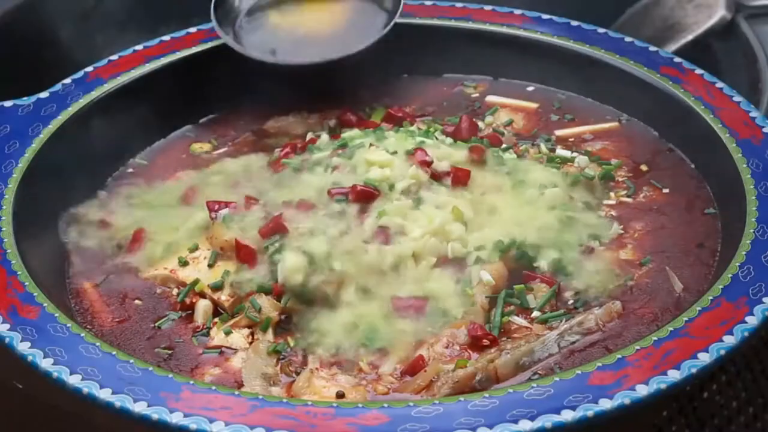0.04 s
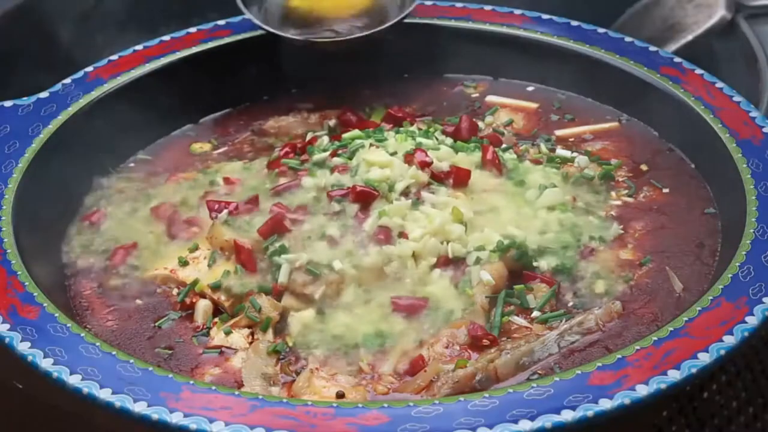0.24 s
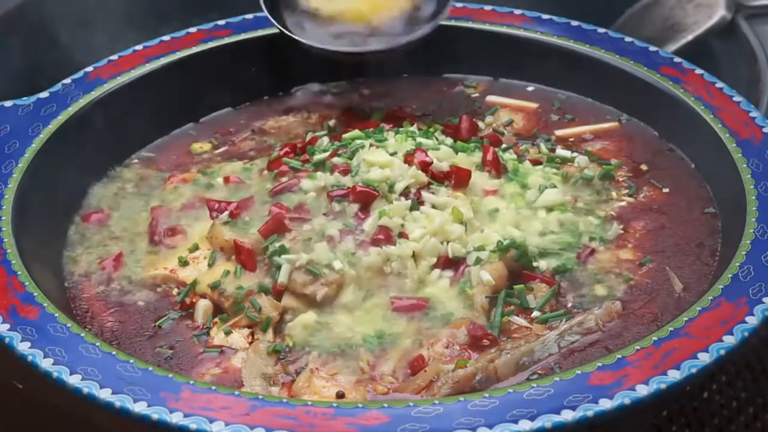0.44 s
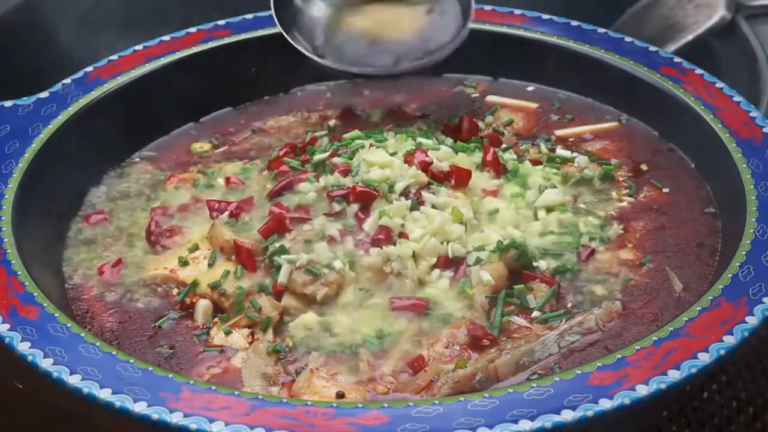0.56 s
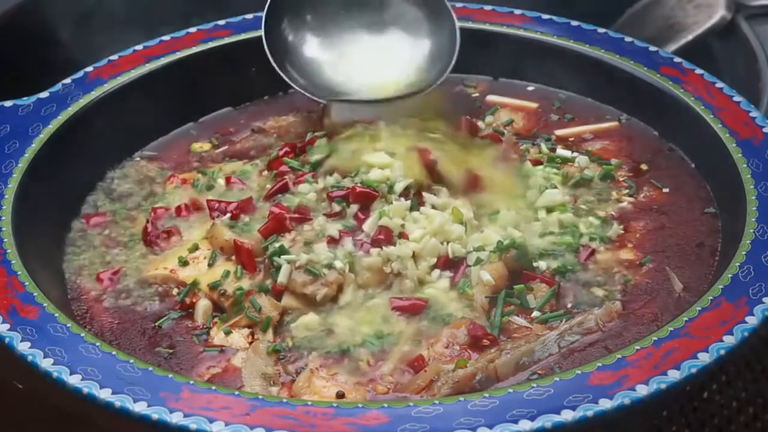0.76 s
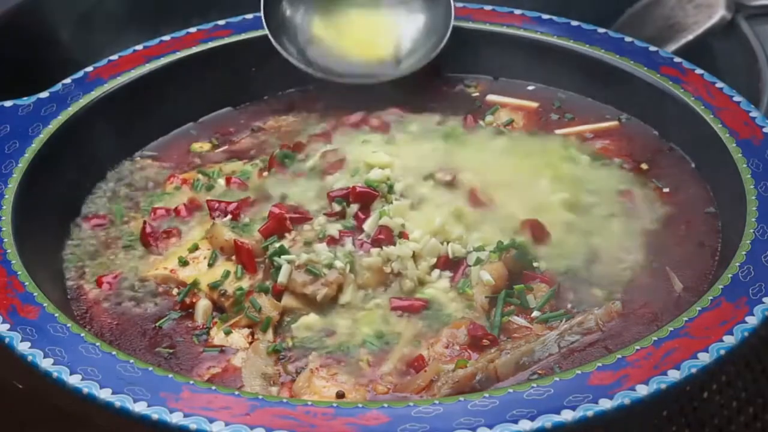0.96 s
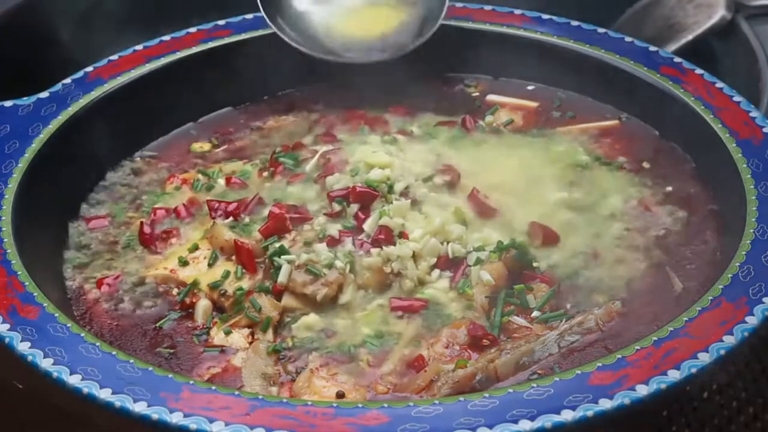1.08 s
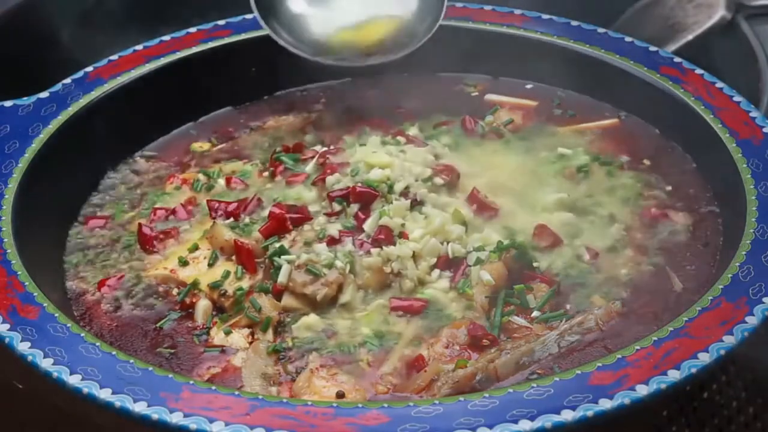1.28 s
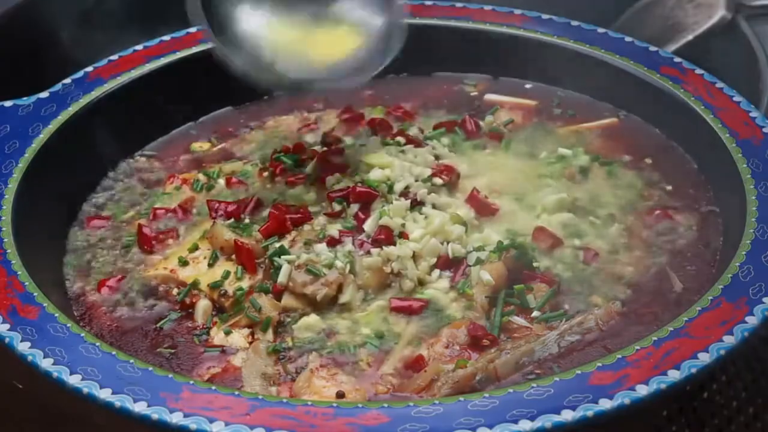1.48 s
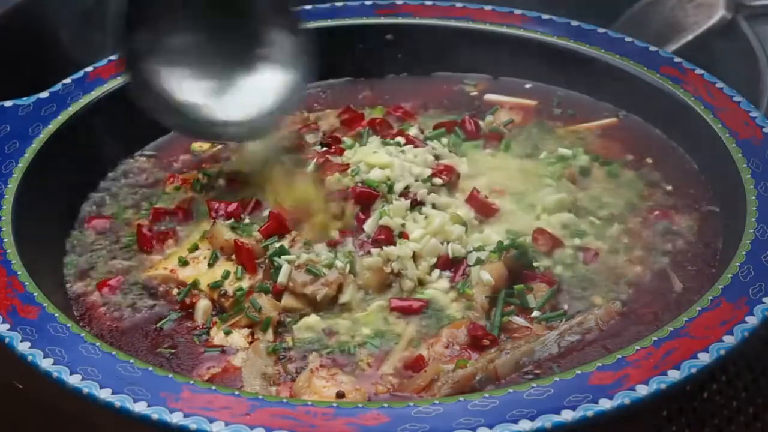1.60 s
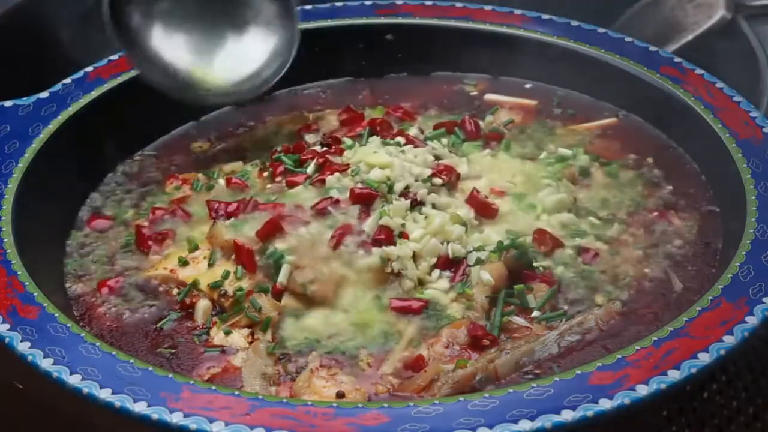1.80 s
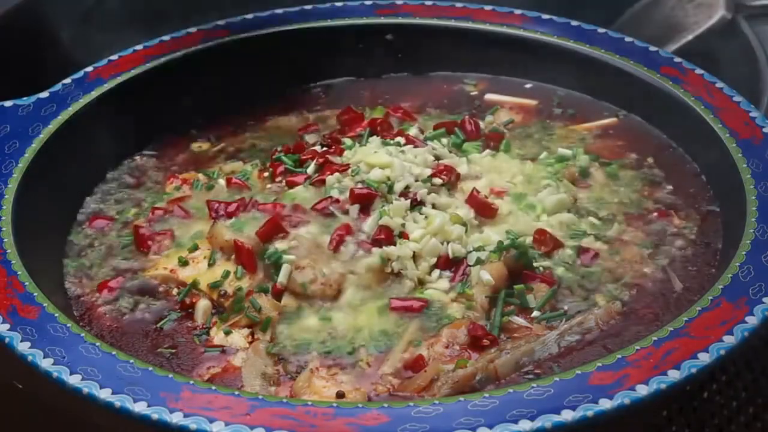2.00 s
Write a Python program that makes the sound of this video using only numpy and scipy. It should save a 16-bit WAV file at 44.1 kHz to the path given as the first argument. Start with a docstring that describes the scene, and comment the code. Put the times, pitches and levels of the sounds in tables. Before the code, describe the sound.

Hot oil sizzles on wet garlic, scallions and chilies in a wide dish, already fading at first, then flaring twice more with sharp pops between; close microphone, outdoor kitchen, very faint low rumble.

```python
"""Hot oil is ladled over garlic, scallions and chilies in a wide dish, close to the microphone, outdoors.
Each ladleful flashes water to steam: a fine fizz and a coarser boil swell, then thin out to a crackle
with single sharp pops. A soft low rumble and a faint hum lie underneath."""
import sys
import numpy as np
from scipy import signal
from scipy.fft import rfft, irfft
from scipy.io import wavfile
from scipy.ndimage import uniform_filter1d

SR = 44100
rng = np.random.default_rng(int(sys.argv[2]) if len(sys.argv) > 2 else 0)


def int16_out(signal):
    """Quantize to a 16-bit WAV file."""
    q = np.round(np.clip(np.atleast_2d(signal).T, -1, 1) * 32767)
    wavfile.write(sys.argv[1], SR, q.astype(np.int16))


N = 89964

# three ladlefuls, the first already fading (s, level of the boil dB, of the crackle dB, of the fizz dB)
SIZZLE = [(0, -23.5, -23.5, -25.5), (0.07, -22.5, -24, -27), (0.165, -22.7, -24.2, -25.5),
          (0.225, -25.5, -26.5, -30), (0.31, -26, -27.3, -32), (0.35, -29.3, -29, -31.5),
          (0.39, -27, -27, -31), (0.44, -28.5, -29, -32.5), (0.6, -28.7, -27.5, -32),
          (0.645, -31.5, -29.5, -33), (0.78, -30.7, -30.3, -32), (0.86, -26, -26.5, -26),
          (0.885, -28, -29.5, -30.5), (0.95, -25, -24.5, -26), (1.04, -22.2, -22.8, -23.7),
          (1.15, -25.3, -25.7, -27.3), (1.225, -27.5, -26.3, -27.5), (1.29, -29.5, -29, -33),
          (1.41, -29.5, -28.7, -31.5), (1.58, -29, -28, -29), (1.645, -31.7, -29.3, -30.5),
          (1.682, -27.5, -25.5, -28), (1.712, -22, -22, -17.5), (1.735, -25.5, -22.5, -21.5),
          (1.81, -23.5, -20.3, -21.5), (1.88, -24.5, -23.5, -25.5), (2.04, -27, -26, -28.5)]  # fixed
# the loudest bursting bubbles (s, level dB, pitch Hz, ring in cycles)
POPS = [(0.0144, -11, 4100, 2.5), (0.0181, -9, 1640, 0.6), (0.0295, -5, 3860, 0.6), (0.0618, -3, 2020, 0.5),
        (0.0701, -8, 4000, 1.6), (0.1108, -6, 1830, 0.6), (0.1186, -10, 2140, 2.5), (0.1797, -7, 3200, 0.6),
        (0.1997, -8, 2560, 0.6), (0.2851, -5, 2270, 0.35), (0.2924, -6, 2270, 0.35), (0.3713, -8.5, 2020, 2.5),
        (0.3984, -8, 2560, 0.35), (0.4692, -11, 3240, 2), (0.4741, -9, 2050, 0.35), (0.4781, -10, 3640, 1),
        (0.498, -10, 4000, 1), (0.5032, -6, 1900, 0.6), (0.5438, -15, 2880, 2.5), (0.5678, -7, 3050, 1),
        (0.5811, -7, 2880, 0.35), (0.5863, -8, 1690, 0.6), (0.6266, -9, 3430, 0.35), (0.6282, -6, 2140, 0.6),
        (0.6579, -10, 4610, 2.5), (0.6774, -14, 4000, 2.5), (0.6822, -8, 1910, 0.6), (0.6847, -8, 3200, 0.8),
        (0.703, -9, 2710, 0.8), (0.7111, -9, 4610, 0.5), (0.7313, -16, 1340, 1.1), (0.7868, -14, 3640, 2.5),
        (0.8412, -11, 3430, 2.5), (0.8434, -10, 4000, 1.6), (0.8597, -5, 1900, 0.35), (0.8606, -1, 4000, 0.9), (0.8658, -11, 3860, 2.5),
        (0.9937, -13, 2290, 2.5), (1.0131, -4, 2710, 0.35), (1.0631, -4, 4890, 0.6), (1.0729, -8, 3240, 1),
        (1.0824, -7, 3200, 0.6), (1.1054, -3, 3430, 0.35), (1.1345, -7, 2860, 0.6), (1.1635, -5, 2880, 0.35),
        (1.165, -20, 650, 1), (1.1746, -3, 3640, 0.35), (1.1844, -13, 1200, 0.6), (1.2147, -7, 2860, 0.6),
        (1.2427, -3, 3640, 0.35), (1.29, -13, 2560, 1.6), (1.3545, -6, 1800, 0.35),
        (1.3612, -16, 900, 1), (1.3786, -12, 1690, 1), (1.42, -11, 4100, 2.5), (1.4276, -14, 2020, 1),
        (1.4697, -11, 3900, 2.5), (1.4866, -15, 2270, 2), (1.5044, -8, 3860, 1.8), (1.5227, -13, 3240, 2.5),
        (1.5339, -11, 1120, 0.7), (1.5369, -20, 940, 2.5), (1.5511, -18, 950, 0.8), (1.5738, -6, 3900, 1.4),
        (1.5918, -11, 1800, 1), (1.6139, -19, 1000, 1.6), (1.6796, -14, 1120, 1), (1.7065, -11, 940, 0.6),
        (1.754, -7, 3860, 2.5), (1.7716, -5, 2410, 0.35), (1.7843, -1, 3640, 0.35), (1.8057, -9, 4000, 2.5),
        (1.8109, -3, 3860, 0.35), (1.8997, -4, 2880, 0.35), (1.9548, -6, 3860, 0.6), (1.9825, -8, 1510, 0.6),
        (1.9835, -20, 460, 1.6), (1.9854, -11, 1510, 0.6), (2.007, -9, 1910, 1), (2.0318, -7, 3240, 0.6)]  # fixed
# thin jets of steam (s, level dB, length s)
SPITS = [(.008, -20.5, 0.01), (0.1, -22, 0.014), (0.28, -18, 0.0067)]
SPIT_HZ = (8700, 14600)
# colour of each size of bubble (Hz, dB per Hz)
BOIL = [(300, -50), (800, -36), (1050, -13), (1250, -8), (2100, -8.5), (2500, -11.5), (3200, -25.5), (6000, -37)]
CRACKLE = [(500, -105), (1800, -16.5), (2600, -7), (3200, -5), (4300, -6.5), (5200, -5.5), (6300, -8), (8000, -21), (14000, -59)]
FIZZ = [(1500, -77), (5000, -9), (6500, -2), (7700, 1.5), (9000, 1), (9700, -2.5), (11600, -3.5), (13500, -3.5), (15700, -11)]
# one cloud for each size of bubble: gain dB, bursts a second, spread of sizes dB, share of smooth hiss 0-1
BOIL_DB, BOIL_PER_S, BOIL_SPREAD_DB, BOIL_HISS = -0.5, 2600, 1.5, 0.5
CRACKLE_DB, CRACKLE_PER_S, CRACKLE_SPREAD_DB, CRACKLE_HISS = 0.6, 2000, 2.8, 0.28  # fixed
FIZZ_DB, FIZZ_PER_S, FIZZ_SPREAD_DB, FIZZ_HISS = 2, 5000, 5, 0.28
BIGGEST = 2.56  # largest random burst, in spreads above the smallest
CLUMP_DB, CLUMP_HZ = 1, 156  # bubbles of all sizes burst in quick flurries
# background rumble: (s, dB) and (Hz, dB per Hz)
RUMBLE_LEVEL = [(0, -55.5), (.5, -49), (.87, -48), (1.3, -47), (1.65, -41), (1.75, -43.5), (2.04, -46)]
RUMBLE = [(15, -22), (30, -13), (48, 2), (70, -5), (85, -17), (104, 6), (135, -1), (170, -5), (260, -4.5), (500, -60)]
# scatter from the dish and stove top
ECHO_DB, ECHO_T60_S, ECHO_DELAY_S = -13, 0.13, 0.0015
MIC_DIPS = [(6320, 800, -10.5), (12800, 850, -9.5)]  # (Hz, width Hz, dB)
EDGE_HZ = 15780  # fixed
TIME = np.arange(N) / SR
GURGLE = [(100, -8.5), (280, -12), (400, -1.5), (560, -6), (700, -2.5), (1000, 0), (1300, -8), (2500, -27)]
GURGLE_FOLLOW = .35  # the largest, gurgling bubbles follow the boil (dB per dB)
GURGLE_DB, GURGLE_PER_S, GURGLE_SPREAD_DB, GURGLE_HISS = -33, 1200, 2, 0.48
POP_DB = 1.0  # fixed
SWELL_CYCLES = 0.23
# the sharpest snaps (s, level dB)
SNAPS = [(.3985, -12), (.8601, 3), (1.0634, -6), (1.0732, -7), (1.1637, -11), (1.6287, -11)]  # fixed
SNAP_HZ, SNAP_CYCLES, REBOUND_S, REBOUND_DB = 7500, .6, .00024, -1  # fixed
# droplets thrown by each pop: energy against the pop, decay time
SPRAY_DB, SPRAY_S = -10, .002  # fixed
HUM_HZ, HUM_DRIFT_HZ = 70, 3  # fixed
HUM_LEVEL = [(0, -59), (.5, -58), (.6, -50), (.81, -45), (.87, -57), (1.08, -53), (2.04, -55)]  # a wavering low hum (s, dB)
# dull low bumps (s, level dB)
THUMPS = [(1.627, -29), (1.66, -33), (1.68, -32)]  # fixed
THUMP_HZ, THUMP_CYCLES = 85.5, 0.37


def amp(db):
    """Decibels to gain."""
    return 10 ** (np.asarray(db) / 20)


def unit(x):
    """Scales to rms 1."""
    return x / np.sqrt(np.mean(x ** 2) + 1e-20)


def add(mix, s, sound):
    """Mixes a sound in at a time."""
    part = mix[max(round(s * SR), 0):][:len(sound)]
    part += sound[:len(part)]


def colour(x, points):
    """Causal filter with the given (Hz, dB) outline."""
    hz, db = np.transpose(points)
    f = abs(np.fft.fftfreq(4096, 1 / SR))  # fixed
    log_gain = np.log(amp(np.interp(np.log(f + 1), np.log(hz), db)))
    taps = np.fft.ifft(np.exp(np.conj(signal.hilbert(log_gain)))).real
    return signal.fftconvolve(x, taps[:len(taps) // 2])[:N]


def burst(hz, ring):
    """One bubble: a short suck, a push and a dying ring; centred in its array."""
    p = np.arange(-256, 257) / SR * hz  # fixed
    return np.sin(2 * np.pi * p) * np.exp(-(p / np.where(p < 0, SWELL_CYCLES, ring)) ** 2)


def cloud(level_db, flurry, outline, low_hz, high_hz, per_s, spread_db, hiss, count=32):
    """Countless small bursts over a smooth hiss; a harder sizzle has more of them."""
    busy = amp(level_db - level_db.mean())
    out = np.zeros(N)
    for hz, ring in zip(np.geomspace(low_hz, high_hz, count), rng.uniform(0.17, 1.68, count)):
        size = amp(spread_db * np.minimum(rng.exponential(1, N), BIGGEST)) * rng.choice([-1, 1], N)
        clicks = size * (rng.random(N) < per_s * busy / count / SR)
        out += signal.fftconvolve(clicks, unit(burst(hz, ring)) * np.sqrt(hz), "same")
    share = np.clip(hiss, 0, 1)
    out = np.sqrt(1 - share) * unit(out / np.sqrt(busy)) + np.sqrt(share) * rng.standard_normal(N)
    return unit(colour(out * flurry, outline)) * amp(level_db)


def sizzle():
    """Steam bubbles of four sizes follow the ladlefuls and share their flurries."""
    s, *levels = np.transpose(SIZZLE)
    boil, crackle, fizz = (np.interp(TIME, s, level) for level in levels)
    gurgle = GURGLE_FOLLOW * (boil - boil.mean())
    flurry = amp(CLUMP_DB * unit(signal.sosfilt(signal.butter(2, CLUMP_HZ, fs=SR, output="sos"), rng.standard_normal(N))))
    return (cloud(gurgle + GURGLE_DB, flurry, GURGLE, 410, 1054, GURGLE_PER_S, GURGLE_SPREAD_DB, GURGLE_HISS)
            + cloud(boil + BOIL_DB, flurry, BOIL, 816, 3820, BOIL_PER_S, BOIL_SPREAD_DB, BOIL_HISS)
            + cloud(crackle + CRACKLE_DB, flurry, CRACKLE, 2860, 5370, CRACKLE_PER_S, CRACKLE_SPREAD_DB, CRACKLE_HISS)
            + cloud(fizz + FIZZ_DB, flurry, FIZZ, 4700, 21600, FIZZ_PER_S, FIZZ_SPREAD_DB, FIZZ_HISS))


def pops():
    """Single large bubbles burst at the surface, each with a brief spray."""
    out = np.zeros(N)
    t = TIME[:SR // 40]
    for s, db, hz, ring in POPS:
        pop = amp(db + POP_DB) * burst(hz, ring)
        drops = rng.standard_normal(len(t)) * t * np.exp(-2 * t / SPRAY_S)
        start = s - len(pop) // 2 / SR
        add(out, start, pop)
        add(out, start, amp(SPRAY_DB) * np.convolve(pop, drops / np.linalg.norm(drops)))
    return out


def spits():
    """Steam escapes through a tiny gap in a brief, very high hiss."""
    out = np.zeros(N)
    band = signal.butter(3, np.clip(SPIT_HZ, 100, SR / 2 - 100), "band", fs=SR, output="sos")
    for s, db, length in SPITS:
        jet = unit(signal.sosfilt(band, rng.standard_normal(N)))[:round(2 * length * SR)]
        add(out, s - length, amp(db) * jet * np.hanning(len(jet)) ** 2)
    return out


def rumble():
    """Low, uneven background noise."""
    hz, db = np.transpose(RUMBLE)
    shape = amp(np.interp(np.log(np.fft.rfftfreq(N, 1 / SR) + 1), np.log(hz), db, right=-100))
    return unit(irfft(rfft(rng.standard_normal(N)) * shape, N)) * amp(np.interp(TIME, *np.transpose(RUMBLE_LEVEL)))


def echoes(x):
    """A brief scatter from the dish and nearby surfaces."""
    t = TIME[:SR // 4]
    tail = rng.standard_normal(len(t)) * amp(-60 * t / ECHO_T60_S) * (t > ECHO_DELAY_S)
    return amp(ECHO_DB) * signal.fftconvolve(x, tail / np.linalg.norm(tail))[:N]


def hum():
    """A faint low hum that wavers, and a few dull bumps."""
    drift = unit(uniform_filter1d(rng.standard_normal(N), SR // 8))
    out = np.sqrt(2) * np.sin(2 * np.pi * np.cumsum(HUM_HZ + HUM_DRIFT_HZ * drift) / SR) * amp(np.interp(TIME, *np.transpose(HUM_LEVEL)))
    for s, db in THUMPS:
        p = (TIME - s) * THUMP_HZ
        out += amp(db) * np.sin(2 * np.pi * p) * np.exp(-(p / THUMP_CYCLES) ** 2)
    return out


def snaps():
    """Water trapped in the oil explodes: a bright, broad click with a rebound."""
    out = np.zeros(N)
    for s, db in SNAPS:
        click = amp(db) * burst(SNAP_HZ, SNAP_CYCLES)
        start = s - len(click) // 2 / SR
        add(out, start, click)
        add(out, start + REBOUND_S, amp(REBOUND_DB) * click)
    return out


def scene():
    """The frying oil, the reflections of its louder bursts, and the background."""
    bursts = pops() + snaps() + spits()
    return (sizzle() + bursts + echoes(bursts) + rumble() + hum())[None]


def record(dry):
    """The microphone has two dips in the treble; then the band limit."""
    f = np.fft.rfftfreq(N, 1 / SR)
    dips_db = sum(db / (1 + (2 * (f - hz) / width) ** 2) for hz, width, db in MIC_DIPS)
    heard = irfft(rfft(dry) * amp(dips_db), N)
    return signal.oaconvolve(heard, signal.firwin(801, EDGE_HZ, window=("kaiser", 9), fs=SR)[None], "same")


dry = scene()
out = record(dry)
int16_out(out)
```